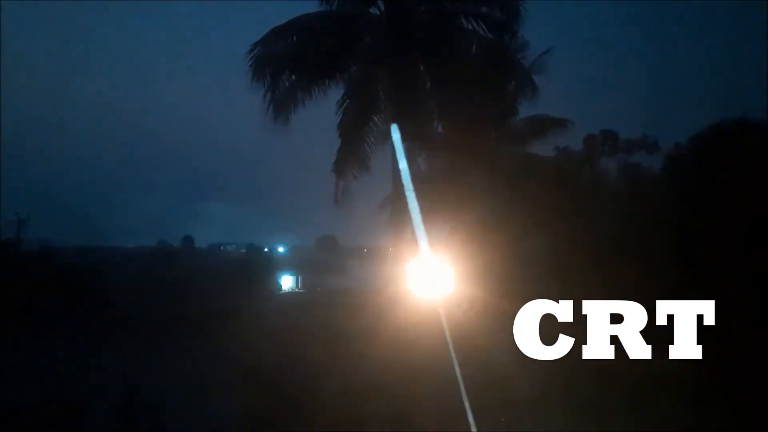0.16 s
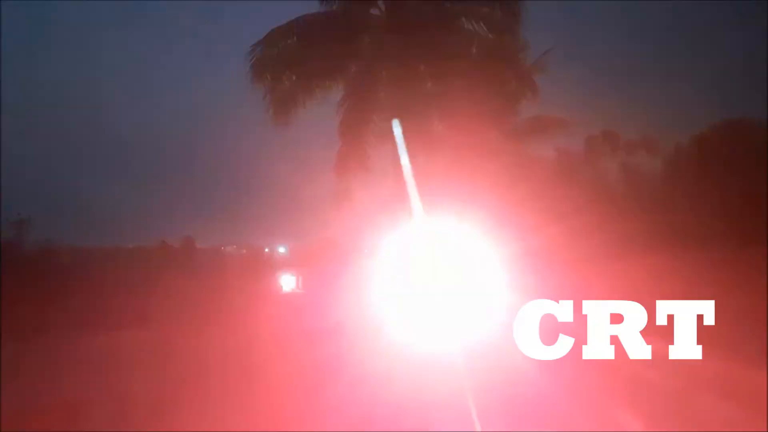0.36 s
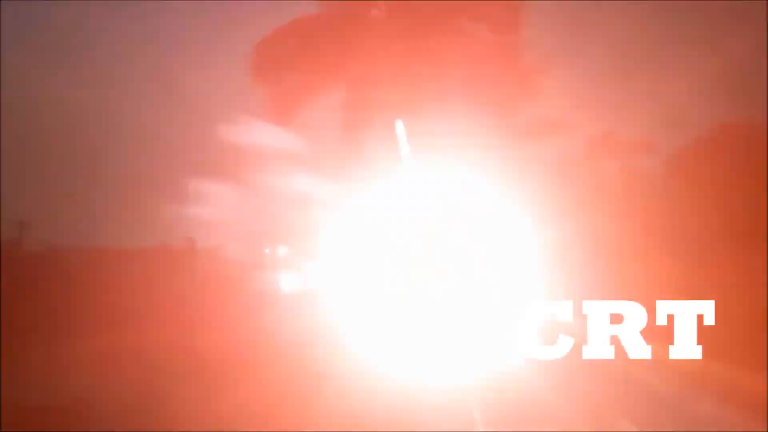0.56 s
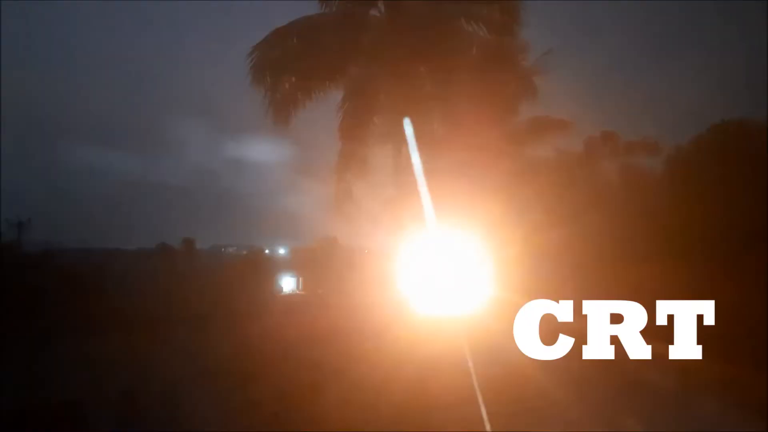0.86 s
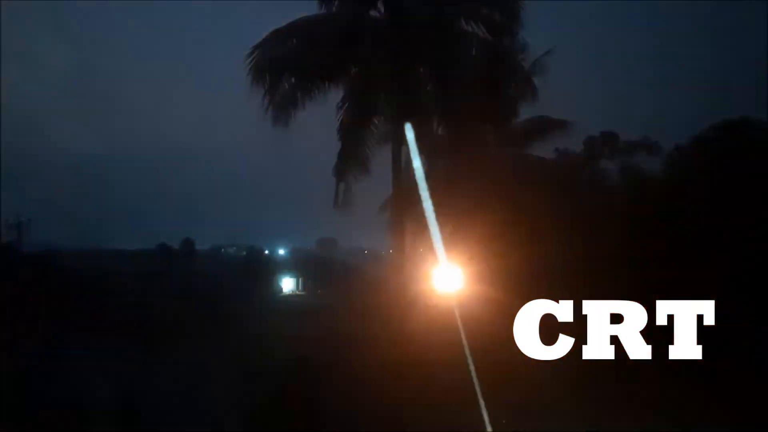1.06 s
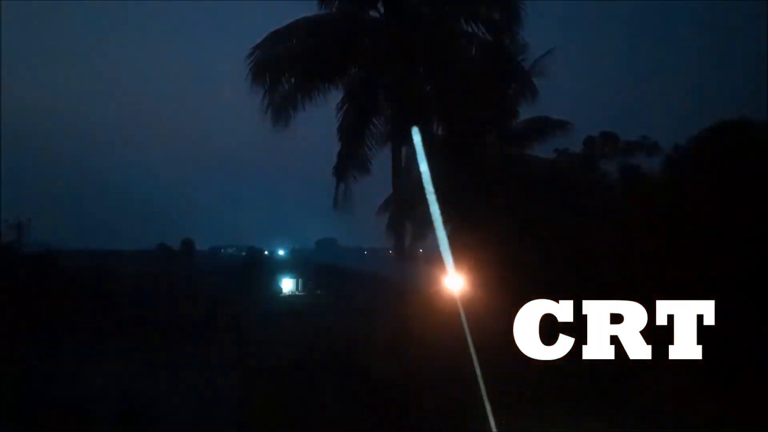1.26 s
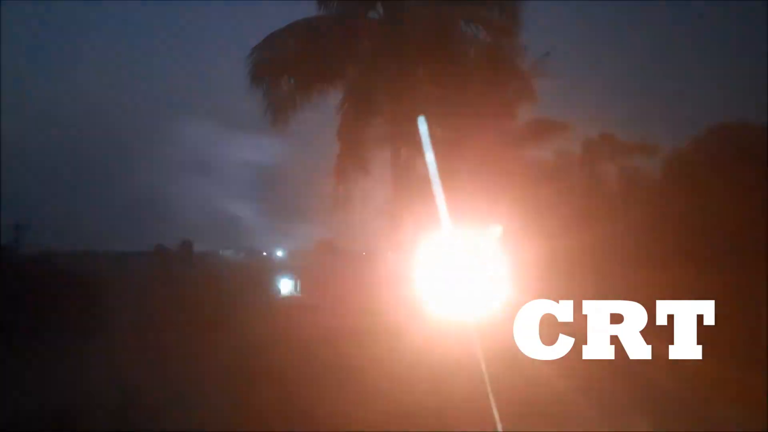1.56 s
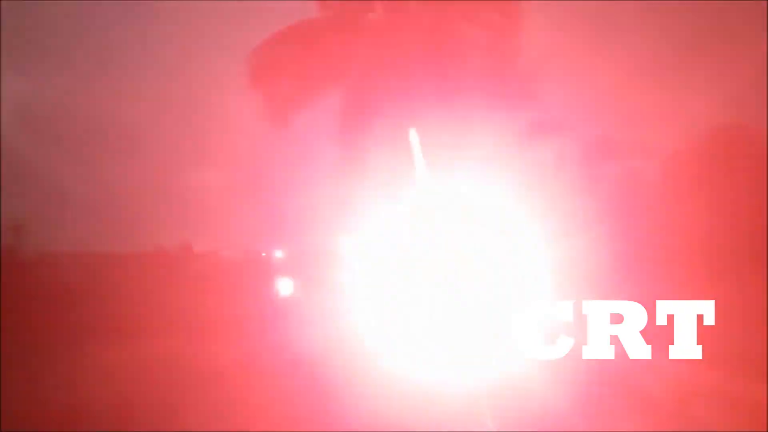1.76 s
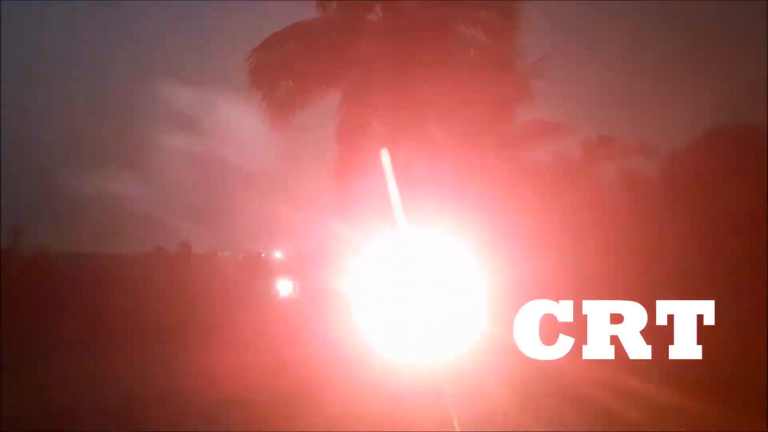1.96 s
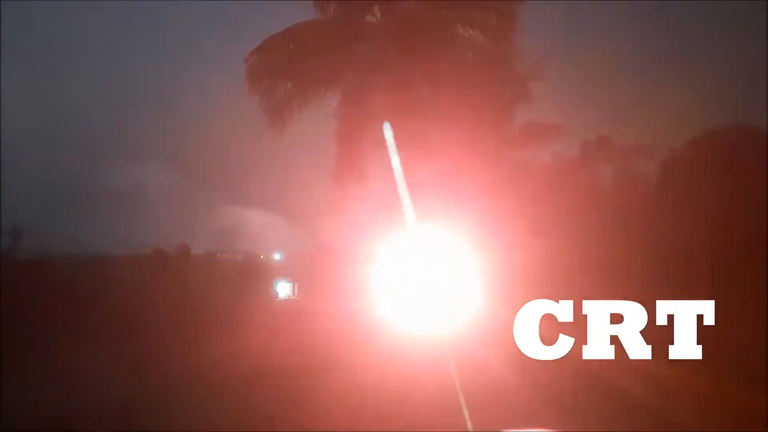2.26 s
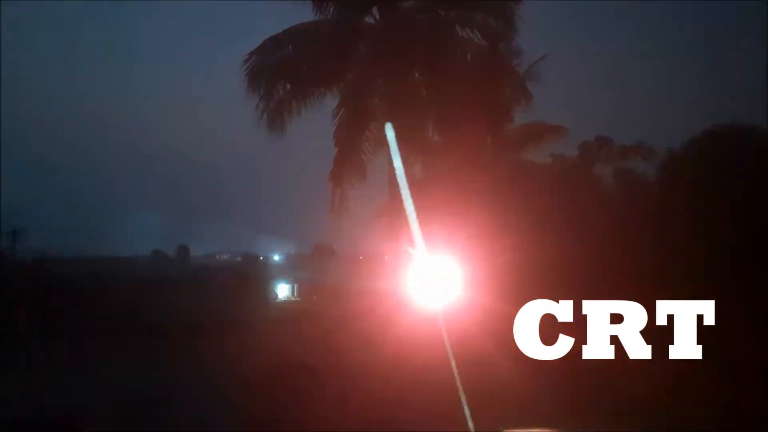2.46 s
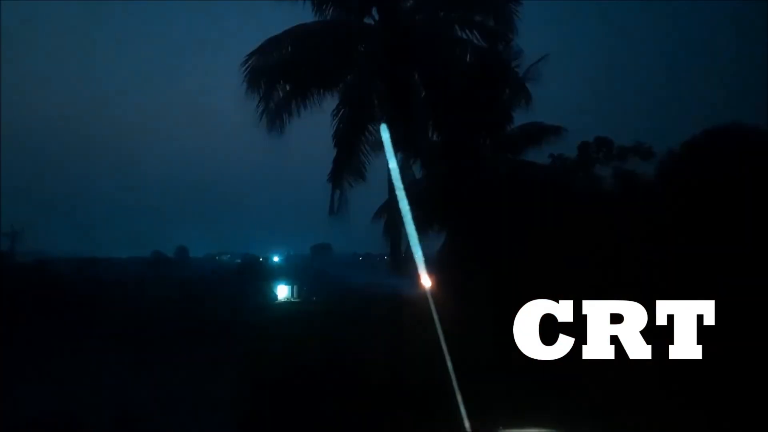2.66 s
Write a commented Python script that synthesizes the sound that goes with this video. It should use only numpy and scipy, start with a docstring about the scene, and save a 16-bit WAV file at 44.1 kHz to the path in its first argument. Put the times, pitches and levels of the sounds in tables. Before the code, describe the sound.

A burning sparkler crackles close to a small stereo microphone outdoors at dusk: quiet first, a dense burst of sharp spits, a pause, a brief weaker sputter, then another long crackling flare that dies away.

```python
"""A hand-held sparkler burns unevenly outdoors at dusk, heard on a close pair of small microphones.
It flares up in three spells: flickering noise hisses, random clicks spit small sparks, listed puffs the loud ones.
Behind it lie a low distant rumble with night air (shaped noise) and a faint mains hum (a sine),
a far chorus of insects (a throbbing band of noise) and a thin high whine (a wavering sine on the right)."""
import sys
import numpy as np
from scipy import signal
from scipy.fft import rfft, irfft, next_fast_len
from scipy.io import wavfile

SR = 44100
rng = np.random.default_rng(int(sys.argv[2]) if len(sys.argv) > 2 else 0)


def makeup_ratio(level_db):
    """Linear amplitude ratio for a level in decibels (20 dB per factor of ten)."""
    decades = np.asarray(level_db, float) / 20
    return 10 ** decades


def materialize(psi):
    """Save the field psi as 16-bit PCM at rate SR to the path in sys.argv[1].

    A 1-D psi becomes a single channel; in a 2-D psi each row is a channel.
    """
    bounded = np.clip(np.atleast_2d(psi).T, -1, 1)
    quanta = np.round(bounded * 32767).astype(np.int16)
    wavfile.write(sys.argv[1], SR, quanta)


N = 123479   # samples, 2.8 s
HALVES = np.array([[.5], [-.5]])   # shares a left-right difference in dB between the two microphones


def rms_one(x):
    """Scale to unit rms."""
    return x / np.sqrt(np.mean(x ** 2) + 1e-20)


def at_hz(points, hz):
    """Read a table on a log-frequency axis."""
    f, v = np.transpose(points)
    return np.interp(np.log(hz + 1), np.log(f + 1), v)


def drift(rate):
    """Slow chance of spread one: noise through two equal low-pass poles at rate Hz."""
    r = np.exp(-2 * np.pi * rate / SR)
    slow = signal.lfilter([1], [1, -2 * r, r * r], rng.standard_normal(N + SR))
    return rms_one(slow[SR:])   # the first second lets the filter settle


def colour(x, spectrum, balance):
    """Give a stereo signal a spectrum, power kept for white input, then a left-right balance."""
    size = next_fast_len(N + 2048)
    hz = np.fft.rfftfreq(size, 1 / SR)
    gain = rms_one(makeup_ratio(at_hz(spectrum, hz)))
    sides = makeup_ratio(at_hz(balance, hz) * HALVES)
    return irfft(rfft(x, size) * gain * sides, size)[:, :N]


def fade(clicks, seconds):
    """Every click starts an exponential decay."""
    return signal.lfilter([1], [1, -np.exp(-1 / (seconds * SR))], clicks + 1e-18)


# Colour of the distant rumble and night air. Each row: frequency in Hz, relative density in dB per Hz.
AIR_COLOUR = [(25, -18), (38, -5), (50, -9.5), (65, 1.5), (92, -5), (240, -6.5), (380, -10), (620, -14.5),
              (1100, -18.5), (1900, -19.5), (2650, -22), (3000, -27.5), (5200, -32.5), (8400, -35.5),
              (10000, -46), (11500, -40.5), (13800, -47), (15000, -54), (15800, -56)]
# How the air swells. Each row: time in seconds, level of the bass, of the low middle and of the rest in dB.
AIR_SWELL = [(0, -1.5, -0.5, -0.5), (.4, 0.5, -1, -1.2), (.6, -0.5, 1.7, 1.5), (.8, 5.5, 1.5, 6.3),
             (1.0, -2, -1.8, -0.3), (1.4, 1.7, 0.5, -0.1), (1.7, -1.8, -3, 1), (2.1, 1.5, 4, 3.4),
             (2.4, -1, 3, 0.4), (2.8, 1.5, 0.5, -0.7)]
# How alike the air is at the two microphones. Each row: frequency in Hz, correlation from -1 to 1.
AIR_LIKENESS = [(60, 0.78), (100, 1), (180, 0.76), (310, 0.71), (550, 0.33), (950, -0.56), (1650, -0.12),
                (2860, 0.22), (4970, -0.1), (8640, -0.26), (15000, 0.11)]
# Which side the air leans to. Each row: frequency in Hz, left over right in dB.
AIR_BALANCE = [(60, 2), (240, 1), (950, 2.0), (3770, 1.5), (15000, 12.5)]
AIR_DB = -46
AIR_SPLIT_HZ = 350, 900   # bass to low middle, low middle to the rest
GUST_DB, GUSTS_HZ = 1.1, 5


def air():
    """Far rumble and night air: noise most alike on both sides in the bass, swelling in three bands."""
    hz, t = np.fft.rfftfreq(N, 1 / SR), np.arange(N) / SR
    alike = np.clip(at_hz(AIR_LIKENESS, hz), -1, 1)
    mid, side = rfft(rng.standard_normal((2, N)))
    pair = np.sqrt(1 + alike) * mid + np.sqrt(1 - alike) * side * [[1], [-1]]
    pair = irfft(pair, N) / np.sqrt(2)
    pair = rfft(colour(pair, AIR_COLOUR, AIR_BALANCE))
    below, under = [1 / (1 + (hz / edge) ** 4) for edge in AIR_SPLIT_HZ]
    bands = [below, under - below, 1 - under]
    seconds, *swells = np.transpose(AIR_SWELL)
    out = np.zeros((2, N))
    for band, swell, gust_db in zip(bands, swells, [GUST_DB, GUST_DB, GUST_DB / 2]):
        level_db = np.interp(t, seconds, swell) + gust_db * drift(GUSTS_HZ)
        out += irfft(pair * band, N) * makeup_ratio(level_db)
    return makeup_ratio(AIR_DB) * out


HUM_HZ, HUM_DB = 50.8, -58


def mains_hum():
    """A faint low sine whose level drifts, equal at both microphones."""
    t = np.arange(N) / SR
    return makeup_ratio(HUM_DB + 2.0 * drift(4.0)) * np.sqrt(2) * np.sin(2 * np.pi * HUM_HZ * t)


INSECT_HZ, INSECT_WIDTH_HZ = 8400, 560   # centre, and reach to either side
INSECT_DB, INSECT_THROB_DB, INSECT_PAN_DB = -58, -2.2, -4   # the pan is left over right


def insects():
    """A far chorus blurred into one gently throbbing band of noise."""
    edges = [INSECT_HZ - INSECT_WIDTH_HZ, INSECT_HZ + INSECT_WIDTH_HZ]
    band = signal.butter(2, edges, "band", fs=SR, output="sos")
    chorus = rms_one(signal.sosfilt(band, rng.standard_normal((2, N))))
    return chorus * makeup_ratio(INSECT_DB + INSECT_THROB_DB * drift(40.0) + INSECT_PAN_DB * HALVES)


WHINE_HZ, WHINE_WAVER_HZ, WHINE_RIGHT_DB = 15633, .8, -57


def whine():
    """A thin, nearly steady sine near the top of hearing, on the right side only."""
    phase = 2 * np.pi * np.cumsum(WHINE_HZ + WHINE_WAVER_HZ * drift(3.0)) / SR
    return np.sqrt(2) * np.sin(phase) * makeup_ratio(WHINE_RIGHT_DB) * [[0], [1]]


HISS_DB, HISS_FLICKER_DB, FLICKER_HZ = -3.5, 1.8, 90   # level relative to the burning


def hiss():
    """Flickering strength of the steady fizz."""
    return makeup_ratio(HISS_DB + HISS_FLICKER_DB * drift(FLICKER_HZ))


SPARKS_PER_S, SPARK_DB, SPARK_SPREAD_DB = 800, -4, 2.8   # rate before its drift; levels relative to the burning


def small_sparks():
    """A rain of single clicks at random moments, most near the lowest level and a few stronger."""
    born = rng.random(N) < SPARKS_PER_S * makeup_ratio(2.5 * drift(40.0)) / SR
    strength = np.minimum(rng.exponential(1, N), 2.5)
    return born * makeup_ratio(SPARK_DB + SPARK_SPREAD_DB * strength)


# The loudest spits. Each row: start in seconds, relative level in dB, left over right in dB, decay in seconds.
SPITS = [(0.4134, -32.0, -3.0, 0.0004), (0.4248, -33.0, 0.0, 0.0003), (0.4501, -30.0, 0.0, 0.0005),
         (0.4562, -22.0, 1.0, 0.0004), (0.4594, -25.0, -1.0, 0.0003), (0.4942, -29.0, -3.0, 0.0024),
         (0.5057, -24.0, 0.0, 0.0007), (0.5096, -23.0, -2.0, 0.0005), (0.5212, -30.0, 0.0, 0.0004),
         (0.5353, -32.0, -1.0, 0.0005), (0.5386, -31.0, -2.0, 0.0011), (0.5488, -27.0, -6.0, 0.0008),
         (0.559, -30.0, -1.0, 0.0007), (0.5663, -17.0, -3.0, 0.0004), (0.5774, -30.0, -3.0, 0.0011),
         (0.5921, -24.0, -1.0, 0.0003), (0.6425, -27.0, 0.0, 0.0006), (0.6497, -27.0, 0.0, 0.0004),
         (0.6842, -25.0, -4.0, 0.0011), (0.7094, -25.0, -3.0, 0.0004), (0.717, -26.0, -2.0, 0.0003),
         (0.729, -30.0, 2.0, 0.0007), (0.7318, -31.0, -3.0, 0.0005), (0.7371, -30.0, -1.0, 0.0004),
         (0.7568, -32.0, -1.0, 0.0014), (0.7641, -23.0, -4.0, 0.0004), (0.7714, -21.0, 1.0, 0.0004),
         (0.7929, -26.0, 1.0, 0.0006), (0.7985, -24.0, -3.0, 0.0003), (0.8082, -28.0, 0.0, 0.001),
         (0.8219, -29.0, -2.0, 0.0009), (0.8289, -24.0, 0.0, 0.0005), (0.8341, -29.0, -2.0, 0.001),
         (0.9034, -30.0, -3.0, 0.0005), (0.9151, -34.0, -1.0, 0.001), (0.9758, -46.0, -3.0, 0.0008),
         (1.3915, -43.0, 0.0, 0.0005), (1.4024, -31.0, -2.0, 0.0006), (1.4097, -26.0, -2.0, 0.0003),
         (1.4126, -31.0, -1.0, 0.0003), (1.4359, -31.0, -1.0, 0.0005), (1.4734, -35.0, 1.0, 0.0005),
         (1.617, -38.0, 2.0, 0.0005), (1.6581, -38.0, -1.0, 0.0005), (1.6709, -32.0, 2.0, 0.0004),
         (1.6807, -42.0, 5.0, 0.0004), (1.7548, -39.0, -1.0, 0.0004), (1.7649, -33.0, -4.0, 0.0004),
         (1.7859, -27.0, -2.0, 0.0012), (1.8323, -32.0, -2.0, 0.001), (1.8434, -28.0, -3.0, 0.0015),
         (1.8649, -31.0, -4.0, 0.0009), (1.8727, -17.0, -1.0, 0.0008), (1.8807, -24.0, -1.0, 0.0006),
         (1.8835, -25.0, -2.0, 0.0005), (1.8884, -26.0, -3.0, 0.0005), (1.9077, -36.0, -2.0, 0.0006),
         (1.9735, -32.0, -1.0, 0.0007), (1.9829, -23.0, 1.0, 0.0005), (2.0154, -31.0, 3.0, 0.0026),
         (2.026, -25.0, 4.0, 0.0005), (2.0677, -28.0, -4.0, 0.0004), (2.0737, -33.0, 2.0, 0.0005),
         (2.0938, -26.0, -3.0, 0.001), (2.0973, -30.0, -1.0, 0.0008), (2.148, -32.0, -2.0, 0.0007),
         (2.2158, -24.0, -1.0, 0.0003), (2.3097, -31.0, -4.0, 0.0007), (2.3126, -33.0, -1.0, 0.0006),
         (2.3381, -30.0, -6.0, 0.0005), (2.3416, -36.0, -2.0, 0.0004), (2.3546, -37.0, -1.0, 0.0007),
         (2.3611, -40.0, -1.0, 0.0011), (2.3856, -28.0, 0.0, 0.0005), (2.4101, -29.0, -1.0, 0.0004),
         (2.4236, -31.0, 2.0, 0.0007), (2.482, -30.0, -3.0, 0.0006), (2.5116, -37.0, 0.0, 0.0009),
         (2.5505, -35.0, -6.0, 0.0004)]
SPIT_DB = 2.5   # lifts all spits
SPIT_RISE_S, SPIT_TAIL_S, SPIT_TAIL_DB = .00008, .0017, -14
SPIT_CRACK_DB = 11.5   # sharp pulse relative to the spit's level


def loud_spits(noise):
    """Each spit is a short puff of noise, fast to rise, with two decays and a sharp pulse near its start."""
    spits, age = np.zeros((2, N)), np.arange(SR // 50) / SR
    for start, db, pan_db, decay in SPITS:
        rise = 1 - np.exp(-age / SPIT_RISE_S)
        tail = makeup_ratio(SPIT_TAIL_DB) * np.exp(-age / SPIT_TAIL_S)
        shape = rise * (np.exp(-age / decay) + tail)
        span = slice(int(start * SR), int(start * SR) + len(age))
        puff = shape * noise[:, span]
        # chance in the noise must not change the energy
        puff *= np.sqrt(np.sum(shape ** 2) / np.sum(puff ** 2, axis=1, keepdims=True))
        puff[:, int(SPIT_RISE_S * SR)] = makeup_ratio(SPIT_CRACK_DB) * np.sign(noise[0, span.start])
        spits[:, span] += puff * makeup_ratio(db + SPIT_DB + pan_db * HALVES)
    return spits


# How fiercely it burns, one list per spell. Each row: time in seconds, relative level in dB.
BURN = [
    [(0.404, -55), (0.414, -38.5), (0.435, -45), (0.457, -33), (0.478, -43), (0.493, -34.5), (0.536, -37.5),
     (0.573, -31.5), (0.607, -43.5), (0.635, -39.5), (0.646, -33.5), (0.677, -43), (0.685, -34.5),
     (0.752, -45), (0.763, -27), (0.781, -37), (0.813, -35.5), (0.833, -35.5), (0.86, -51.5),
     (0.914, -41.5), (0.938, -67), (1.0, -63)],
    [(1.36, -54), (1.392, -58), (1.406, -33), (1.463, -46), (1.508, -41.5), (1.559, -65), (1.596, -59),
     (1.619, -47.5), (1.72, -58.0)],
    [(1.72, -76), (1.745, -50), (1.785, -32), (1.804, -40), (1.844, -38), (1.873, -33), (1.878, -30),
     (1.9, -44), (1.939, -51), (1.979, -30), (2.001, -43.5), (2.021, -34), (2.031, -48), (2.046, -51),
     (2.058, -38), (2.085, -44.5), (2.093, -38), (2.136, -44.5), (2.145, -38), (2.16, -44.5),
     (2.204, -44.5), (2.219, -38.0), (2.226, -41.5), (2.284, -64), (2.311, -38), (2.376, -52), (2.385, -39),
     (2.403, -51), (2.422, -38.5), (2.436, -44.5), (2.548, -44), (2.578, -60.0), (2.62, -76)],
]
# Colour of the burning. Each row: frequency in Hz, relative density in dB per Hz.
FIZZ_COLOUR = [(400, 1), (700, -6.5), (1200, -4.5), (2000, -4), (4000, -3.5), (6300, -3), (7500, -3.5),
               (9200, 0), (11000, -2.5), (12800, -4.5), (14200, -3.5), (15800, -1)]
# Colour of the spits and spark clicks. Each row: frequency in Hz, relative density in dB per Hz.
SNAP_COLOUR = [(400, -22), (1000, -14), (2500, -11), (5000, -9), (9000, -4), (11000, -3), (12700, 2),
               (14500, -2), (15800, -3)]
# Which side the sparkler leans to. Each row: frequency in Hz, left over right in dB.
FIZZ_BALANCE = [(60, 1.5), (240, 16), (950, 0), (3770, 2), (15000, -1.5)]
FIZZ_UNLIKE = 0.34   # share of noise power that reaches each microphone by its own path
SPARK_S, SPARK_CRACK_DB = .0003, 7   # decay of a small spark, lift of its bare click
FIZZ_LOW_HZ, LEFT_LAG_S = 556, .000022   # high-pass corner, delay of the left microphone


def sparkler():
    """Hiss and small sparks follow the burning, loud spits their own list; the left side lags slightly."""
    t = np.arange(N) / SR
    burn = np.zeros(N)
    for spell in BURN:
        burn += makeup_ratio(np.interp(t, *np.transpose(spell), left=-120, right=-120))
    steady = hiss()
    clicks = small_sparks()
    shared, own = rng.standard_normal(N), rng.standard_normal((2, N))
    noise = np.sqrt(1 - FIZZ_UNLIKE) * shared + np.sqrt(FIZZ_UNLIKE) * own
    fizz = burn * (steady + fade(clicks, SPARK_S)) * noise
    snaps = loud_spits(noise) + burn * clicks * makeup_ratio(SPARK_CRACK_DB)
    out = colour(fizz, FIZZ_COLOUR, FIZZ_BALANCE) + colour(snaps, SNAP_COLOUR, FIZZ_BALANCE)
    out = signal.sosfilt(signal.butter(2, FIZZ_LOW_HZ, "high", fs=SR, output="sos"), out)
    lag = np.exp(-2j * np.pi * np.fft.rfftfreq(N, 1 / SR) * LEFT_LAG_S)
    return np.array([irfft(rfft(out[0]) * lag, N), out[1]])


def scene():
    """All sources together at the pair of microphones."""
    return sparkler() + air() + mains_hum() + insects() + whine()


def band_limit(x):
    """A steep low-pass at the top of the band."""
    return signal.sosfilt(signal.butter(12, 17020, fs=SR, output="sos"), x)


CUTOFF_HZ = 15750


def record(dry):
    """The top is cut steeply by an elliptic low-pass."""
    low_pass = signal.ellip(9, .5, 50, CUTOFF_HZ, fs=SR, output="sos")
    mix = signal.sosfilt(low_pass, dry)
    return band_limit(mix)


dry = scene()
out = record(dry)
materialize(out)
```